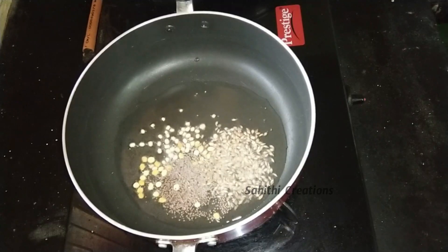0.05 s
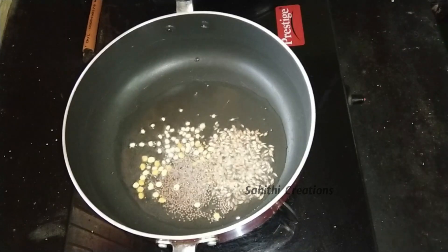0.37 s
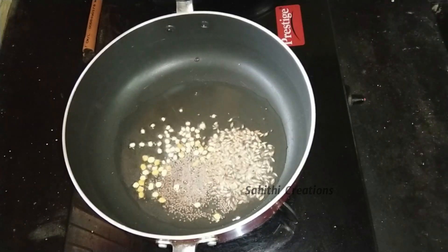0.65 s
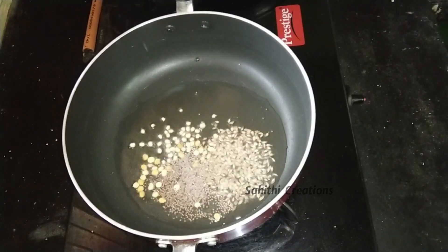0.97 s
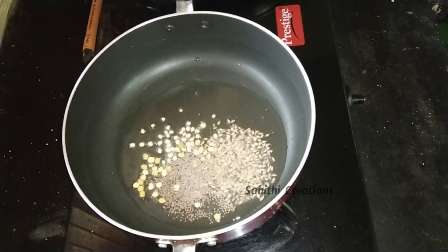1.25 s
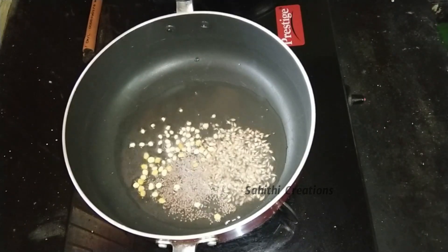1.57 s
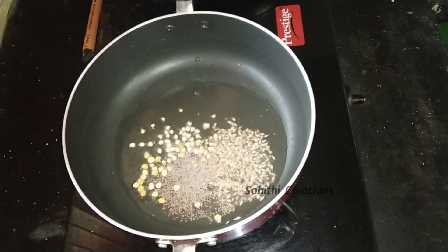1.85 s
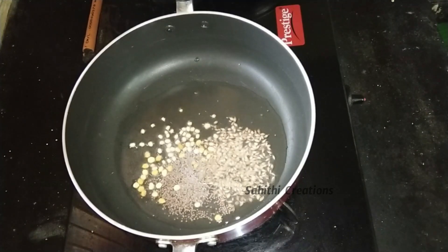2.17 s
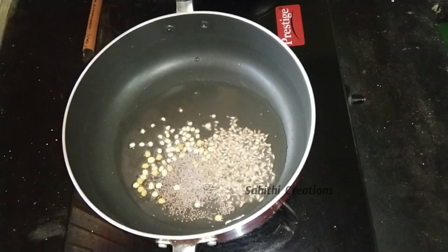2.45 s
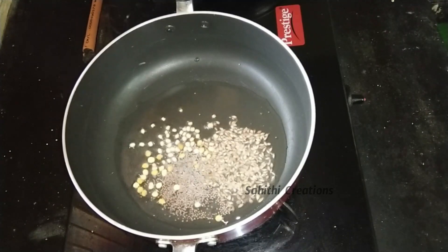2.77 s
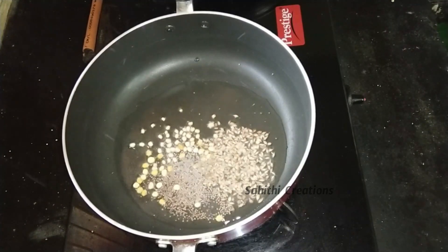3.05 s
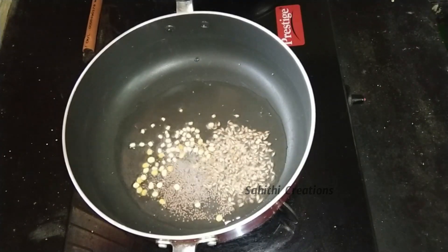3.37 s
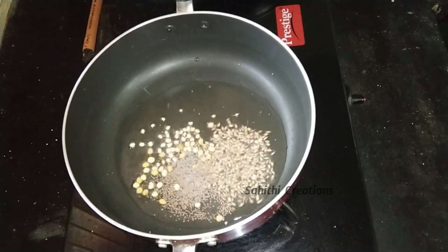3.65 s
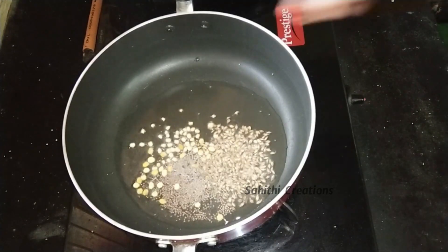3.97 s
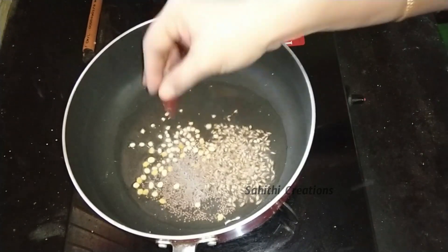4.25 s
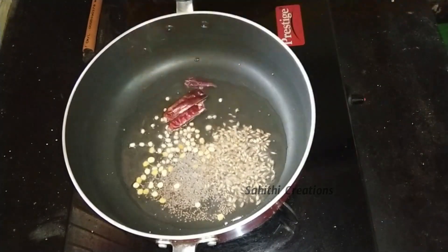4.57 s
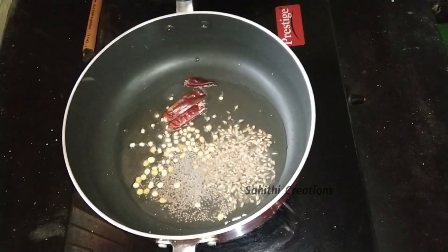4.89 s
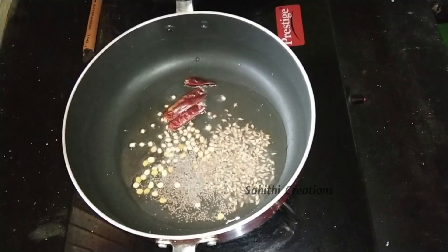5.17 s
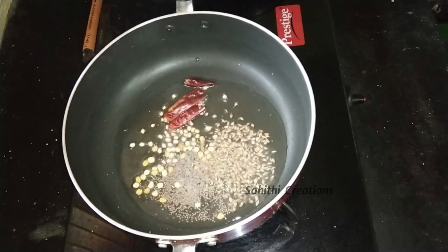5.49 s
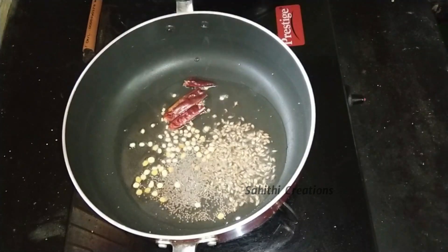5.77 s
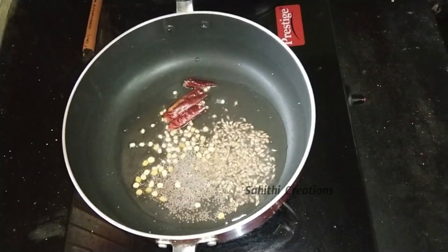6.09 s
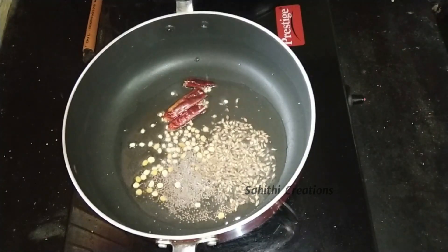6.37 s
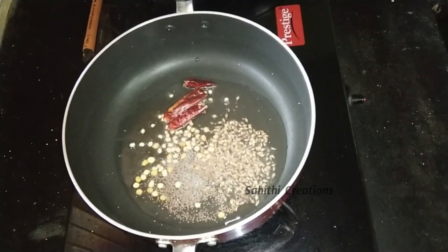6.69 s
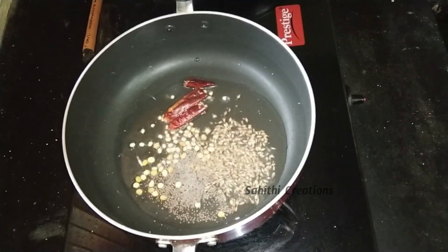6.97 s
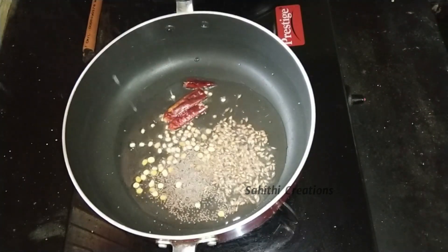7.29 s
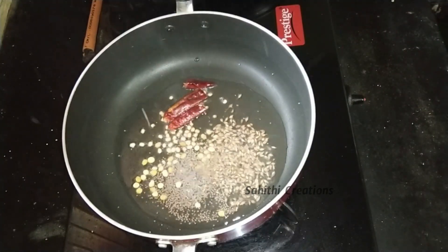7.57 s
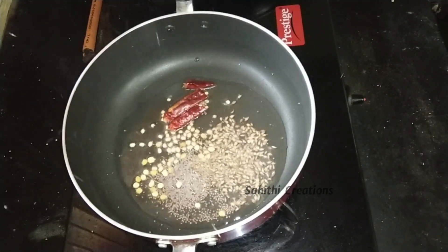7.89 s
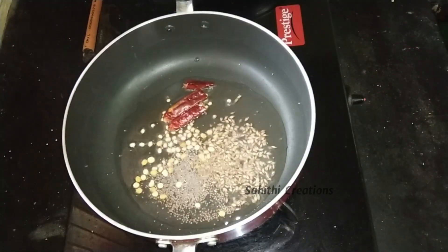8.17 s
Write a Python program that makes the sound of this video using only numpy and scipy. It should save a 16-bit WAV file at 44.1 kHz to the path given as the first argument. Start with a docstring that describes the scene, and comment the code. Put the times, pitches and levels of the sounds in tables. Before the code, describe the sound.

Sharp, bright snaps of seeds bursting in a deep oiled pan come ever faster over a faint gas flame.

```python
"""Seeds bursting in hot oil

Mustard and cumin seeds burst in a deep pan, more and more often, over a low gas flame in a small kitchen.
Each husk snaps and sets a short ping ringing; the pan scatters the sound and the room adds a tail.
Oil spits strike the microphone close above. The cook slides something aside and drops in dried chillies;
the simmer then grows."""
import sys
import numpy as np
from scipy import signal
from scipy.fft import rfft, irfft
from scipy.io import wavfile

SR = 44100
rng = np.random.default_rng(int(sys.argv[2]) if len(sys.argv) > 2 else 0)


def wav_out(sig):
    """Save sig, one row per channel (or a flat mono array), as 16-bit PCM at SR to the path in sys.argv[1]."""
    wavfile.write(sys.argv[1], SR, np.round(np.clip(np.atleast_2d(sig).T, -1, 1) * 32767).astype(np.int16))


N = 367353
TIME = np.arange(N) / SR

# louder seed bursts, relative levels: start_s, snap_db, ping_db, pitch_hz
BURSTS = [(0.1952, -22.5, -4.5, 3800), (0.2715, -14, -18, 4200), (0.4712, -14.5, -21, 3940),
          (0.521, -12, -24, 4200), (0.7118, -15, -17, 3830), (0.9052, -13.5, -10.5, 4050),
          (1.0187, -14, -22.5, 4390), (1.085, -16, -25, 4150), (1.1958, -15, -15, 3740),
          (1.2515, -15.5, -8.5, 3630), (1.3029, -11.5, -22, 4370), (1.4138, -15.5, -8.5, 3460),
          (1.447, -10, -19, 3730), (1.565, -11.5, -10.5, 3660), (1.5785, -17.5, -18, 3260),
          (1.6366, -15.5, -9, 3480), (1.7444, -20, -13.5, 3440), (1.7712, -15.5, -22, 4420),
          (1.815, -19.5, -8, 3490), (1.851, -7, -21, 4650), (2.0359, -23, -4, 3610),
          (2.1147, -14.5, -10, 2700), (2.364, -20.5, -20.5, 4480), (2.4326, -17, -7, 3820),
          (2.657, -18, -16, 3380), (2.673, -15, -25, 3650), (2.792, -12, -4, 4260),
          (2.9103, -6.5, -18, 4690), (2.9389, -9.5, 0, 3700), (3.011, -14, -24, 4080),
          (3.201, -12, -10, 4230), (3.3428, -11, -5.5, 3640), (3.4, -13.5, -11, 3450),
          (3.4086, -12.5, -23, 3940), (3.4469, -12.5, 1, 3130), (3.486, -20.5, -4.5, 3420),
          (3.5761, -12, -15, 3960), (3.6272, -16, -22, 4410), (3.7196, -11.5, -9.5, 3640),
          (3.7502, -17.5, -3.5, 3880), (3.7967, -17, -0.5, 4300), (3.8565, -22, -9, 3590),
          (3.8874, -14, -23, 4000), (3.9112, -10.5, -7.5, 4050), (3.9652, -13, -21, 4510),
          (4.1267, -16, -2.5, 3960), (4.153, -12.5, -6, 4070), (4.2073, -13, -25, 4300),
          (4.2815, -15, -20.5, 3810), (4.3588, -22, -17.5, 3200), (4.3651, -11.5, -12.5, 3650),
          (4.4562, -16.5, -19, 4300), (4.5152, -14.5, -22, 4190), (4.5447, -31, -14, 3720),
          (4.6669, -14.5, -23, 3940), (4.7065, -23.5, -3.5, 3730), (4.7381, -13, -12, 3770),
          (4.808, -13.5, -22, 4110), (4.8576, -9.5, -15, 3480), (4.9107, -12, -14, 3880),
          (4.9908, -21, -8.5, 4140), (5.0225, -21, -15.5, 3520), (5.0891, -8, -3.5, 3700),
          (5.1088, -21, -6.5, 3680), (5.1619, -23, -5, 3450), (5.235, -18, -6, 3570),
          (5.2571, -16.5, -25, 4430), (5.361, -17.5, -18, 3650), (5.3748, -18, -17.5, 3600),
          (5.4489, -16.5, -6, 3610), (5.4768, -6.5, -18, 3730), (5.5026, -19.5, -9, 3830),
          (5.5837, -14.5, -21, 4240), (5.6201, -10, -3.5, 3820), (5.7393, -10, -10, 3750),
          (5.8011, -11.5, -7.5, 4300), (5.8617, -21.5, -1.5, 3980), (5.9205, -7.5, -20, 4070),
          (5.9797, -25, -6, 3730), (6.0147, -11, -21, 4470), (6.024, -16, -4.5, 3600),
          (6.0797, -5.5, -5.5, 4100), (6.272, -20.5, -17, 3800), (6.306, -13, -10, 3640),
          (6.316, -10.5, -6.5, 3900), (6.3358, -15, -4.5, 3480), (6.3597, -10.5, -7, 3800),
          (6.4221, -19, -5.5, 3550), (6.483, -18.5, -11.5, 4020), (6.5075, -15, -31, 4070),
          (6.525, -12.5, -9.5, 3510), (6.5386, -16.5, -5.5, 4040), (6.6431, -11, -21, 3720),
          (6.6624, -15, -10, 3760), (6.702, -21, -1, 2920), (6.7157, -11.5, -12, 3060),
          (6.787, -20, -8, 4030), (6.8969, -8.5, -5.5, 3520), (6.9578, -13, -19, 4230),
          (7.0123, -16.5, -20, 4100), (7.0673, -12.5, -19, 3960), (7.1584, -15.5, -18, 3940),
          (7.193, -18.5, -14.5, 4270), (7.222, -13.5, -16, 3860), (7.2689, -26, -7, 3510),
          (7.2912, -12, -16, 4050), (7.38, -6.5, -5.5, 3560), (7.3973, -20, -6.5, 3520),
          (7.4379, -19, -7.5, 3980), (7.4952, -12, -17, 3860), (7.5186, -11.5, -18, 4230),
          (7.5771, -14.5, -14, 3640), (7.6402, -10.5, -8, 3830), (7.657, -16, -3, 3530),
          (7.6713, -30, -3.5, 3590), (7.7069, -20, -3, 3640), (7.7512, -16.5, -1.5, 3380),
          (7.759, -18.5, -1.5, 3360), (7.8069, -9, -4, 3800), (7.8932, -21, -10, 3540),
          (7.9664, -25, -15, 4380), (8.0618, -23, -9.5, 3280), (8.0951, -10.5, -12.5, 3790),
          (8.166, -23, -4, 3550), (8.253, -6, 2.5, 3760)]
# spectrum of a splitting husk: freq_hz, gain_db
HUSK_SPECTRUM = [(150, -27.5), (600, -12), (1100, -14.5), (1600, -7.5), (2100, -9), (2600, -5), (3500, -3),
                 (4600, 0), (5800, 1.5), (7000, 5.5), (7700, 3.5), (8500, -5)]
# response of the pan's hollow: freq_hz, gain_db
PAN_HOLLOW = [(2300, -2), (2700, 2.5), (3050, -6), (3380, 3.5), (3700, 1), (4100, 0.5), (4800, 4),
              (5800, -0.5)]


def seed_bursts(snap_gain_db=8.5, ping_t60_s=0.0036, room_ping_t60_s=0.002, room_ping_db=-1.5):
    """Each husk splits with a bright snap and a short ping, its pitch set by the seed."""
    snaps, pings = np.zeros(N), np.zeros(N)
    click = TIME[:SR // 100] == 0
    for start_s, snap_db, ping_db, pitch_hz in [*BURSTS, *neighbour_bursts()]:
        # seeds under the heap send less direct sound and more echoes
        echo_db = -1.8 + rng.uniform(-2, 2)
        snap = in_room(pan_scatter(echo_db, t60_s=0.039))
        add(snaps, start_s, from_db(snap_db + snap_gain_db) * snap)
        ping = unit_energy(ring(pan_scatter(echo_db + 4.5, t60_s=0.018), pitch_hz, ping_t60_s))
        add(pings, start_s, from_db(ping_db) * ping)
        # the room gets a blunter, less pitched ping
        blunt_ping = unit_energy(ring(click, pitch_hz, room_ping_t60_s))
        room_ping = signal.fftconvolve(blunt_ping, kitchen_response())
        add(pings, start_s, from_db(ping_db + room_ping_db) * room_ping)
    pings = butter(colour(pings, PAN_HOLLOW), 2330, "high", order=4)
    return colour(snaps, HUSK_SPECTRUM) + butter(pings, 5600, "low")


def neighbour_bursts(tries=3, first_chance=0.025, doubling_s=1.5, wait_s=(0.009, 0.075), gap_s=0.026):
    """A burst may set off weaker ones, more likely as the oil heats; rows as in BURSTS."""
    loud_s = np.array(BURSTS)[:, 0]
    next_loud_s = np.repeat(np.append(loud_s[1:], TIME[-1]), tries)
    luck, delay = rng.random((len(next_loud_s), 2)).T
    start_s = np.repeat(loud_s, tries) + np.interp(delay, [0, 1], wait_s)
    snap_db, ping_db, pitch_hz = rng.normal([-16.5, -23.5, 3700], [3, 3, 320], (len(start_s), 3)).T
    set_off = luck < first_chance * 2 ** (start_s / doubling_s)
    in_pause = start_s < next_loud_s - gap_s
    return np.transpose([start_s, snap_db, ping_db, pitch_hz])[set_off & in_pause]


def pan_scatter(echo_db, t60_s, echoes_per_s=3500):
    """Direct sound, then quick echoes off the pan wall; energy 1."""
    t = TIME[:SR // 40]
    echoes = rng.standard_normal(len(t)) * (rng.random(len(t)) < echoes_per_s / SR)
    echoes *= dying(t, t60_s) * (t > 0.0004)
    return unit_energy((t == 0) + from_db(echo_db) * unit_energy(echoes))


# pan modes: freq_hz, gain_db, t60_s
PAN_MODES = [(1875, -39.5, 0.047), (2091, -48.5, 0.18), (2650, -50, .04), (2758, -46.5, 0.088),
             (2970, -53, 0.04), (3130, -54, 0.2), (3383, -53, 0.09), (3536, -49.5, 0.047),
             (3640, -49.5, 0.04), (4260, -69, 0.14), (4380, -73.5, .1), (5700, -64, 0.091),
             (6100, -58, 0.16), (6220, -57.5, 0.1), (6450, -70, 0.045)]


def in_pan(sound):
    """A sound plus the faint ringing it leaves in the pan."""
    return sound + sum(from_db(db) * ring(sound, hz, t60_s) for hz, db, t60_s in PAN_MODES)


# spectrum of tiny steam bubbles: freq_hz, gain_db
FIZZ_SPECTRUM = [(1000, -11), (2200, -20), (2800, -18), (3500, 4.5), (4300, 2.5), (5200, -5), (7200, -1.5),
                 (8500, -8)]


def simmer(rise_from_s=5.9, bubbles_per_s=3000, fizz_db=-56, rise_db_per_s=1.9, tick_db=-21.5):
    """Tiny steam bubbles fizz and larger ones tick; both build up as the chillies fry."""
    frying_s = np.maximum(TIME - rise_from_s, 0)
    ticks_per_s = 3 + 16 * frying_s
    ticks = (rng.random(N) < ticks_per_s / SR) * from_db(tick_db) * rng.random(N)
    ticks = signal.fftconvolve(ticks, in_room(pan_scatter(echo_db=3.0, t60_s=0.021)))[:N]
    bubbles = (rng.random(N) < bubbles_per_s / SR) * rng.standard_normal(N)
    fizz = rms_one(colour(bubbles, FIZZ_SPECTRUM))
    return colour(ticks, HUSK_SPECTRUM) + from_db(fizz_db + rise_db_per_s * frying_s) * fizz


# oil drops on the microphone: start_s, signed_height, leak_s, lowpass_hz
OIL_DROPS = [(1.3793, -0.16, 0.000085, 5000), (1.7719, -0.059, 0.00018, 5000),
             (1.8926, -0.19, 0.00007, 5000), (2.8898, 0.43, .05, 1100), (4.9760, 0.055, 0.00012, 4000),
             (5.9329, -0.089, .00013, 5000), (6.3512, -0.12, 0.00011, 5000), (6.5850, -.33, .0018, 5000),
             (7.0127, .09, .05, 2500), (7.7259, -0.41, .05, 4000), (8.2372, 0.18, .05, 600)]


def oil_spits(bass_cut_hz=61):
    """A drop on the port is a leaking pressure step; the microphone's bass cut makes it swing."""
    pressure, t = np.zeros(N), TIME[:SR // 2]
    for start_s, height, leak_s, lowpass_hz in OIL_DROPS:
        step = height * np.exp(-t / leak_s)
        add(pressure, start_s, butter(step, lowpass_hz, "low", order=1))
    return butter(pressure, bass_cut_hz, "high", order=5)


# slides over the counter: start_s, length_s, level_db, resonance_hz
COUNTER_SLIDES = [(0.331, 0.11, -52, 873), (0.368, 0.2, -59.5, 900), (1.727, 0.24, -61, 1084),
                  (2.21, 0.16, -58.5, 780), (5.471, 0.24, -58, 585), (5.509, 0.29, -62.5, 317)]


def slides(grit_db=1.5, width_hz=100):
    """Soft friction: a band of grit plus noise through one resonance."""
    out = np.zeros(N)
    for start_s, length_s, level_db, resonance_hz in COUNTER_SLIDES:
        size = int(length_s * SR)
        grit = rms_one(butter(rng.standard_normal(size), [700, 2600], "band"))
        friction = narrow_noise(resonance_hz, width_hz, size) + from_db(grit_db) * grit
        add(out, start_s, from_db(level_db) * np.sqrt(np.hanning(size)) * friction)
    return butter(out, 200, "high")


# light blows as the chillies go in: start_s, level_db
BLOWS = [(4.3585, -45.5), (4.3795, -35), (4.470, -52)]
# modes of the knocked body: freq_hz, gain_db, t60_s
BODY_MODES = [(645, 4.5, 0.05), (900, 1, .015), (1210, -7, 0.13), (1335, 4.5, 0.016), (1825, -4.5, 0.05)]


def knocks():
    """Each blow rings a few dull modes."""
    blows = np.zeros(N)
    for start_s, level_db in BLOWS:
        add(blows, start_s, from_db([level_db]))
    ringing = sum(from_db(db) * ring(blows, hz, t60_s) for hz, db, t60_s in BODY_MODES)
    return butter(ringing, 680, "high", order=3)


# spectrum of the flame and kitchen air: freq_hz, gain_db
FLAME_SPECTRUM = [(25, -34), (50, -24), (75, -9), (100, 6), (150, -2), (240, -5), (350, -0.5), (480, -8),
                  (620, -8.5), (1000, -10.5), (1700, -15), (3000, -11), (8000, -23)]


def gas_flame(level_db=-54):
    """The flame's soft, steady rush."""
    return from_db(level_db) * rms_one(colour(rng.standard_normal(N), FLAME_SPECTRUM))


# hum tones: pitch_hz, level_db, waver_width_hz, steady_gain
HUM_TONES = [(96, -64.5, 12, .3), (240.2, -66.5, 9.2, 0.9), (493.6, -64, 39, 0.69)]


def hum(waver_gain=0.43):
    """Low tones that waver a little: each is a sine plus narrow noise."""
    out = np.zeros(N)
    for pitch_hz, level_db, width_hz, steady_gain in HUM_TONES:
        steady = steady_gain * np.sin(2 * np.pi * pitch_hz * TIME)
        waver = waver_gain * narrow_noise(pitch_hz, width_hz, N)
        out += from_db(level_db) * rms_one(steady + waver)
    return butter(out, 60, "high")


def kitchen_response(tail_db=-5, t60_s=0.29, wall_s=0.011, wall_db=-16.5):
    """One distinct echo and a diffuse tail, different for every spot."""
    t = TIME[:SR // 3]
    tail = rng.standard_normal(len(t)) * dying(t, t60_s) * (t > 0.004)
    response = from_db(tail_db) * unit_energy(tail)
    add(response, rng.normal(wall_s, 0.00033), from_db([wall_db]))
    return response


def in_room(sound):
    """A sound plus its reverberation."""
    out = signal.fftconvolve(sound, kitchen_response())
    add(out, 0, sound)
    return out


def from_db(db):
    """Decibels to gain."""
    return 10 ** (np.asarray(db) / 20)


def rms_one(x):
    """Scale to rms 1."""
    return x / np.sqrt(np.mean(x ** 2) + 1e-20)


def unit_energy(x):
    """Scale to energy 1."""
    return x / np.sqrt(np.sum(x ** 2) + 1e-20)


def butter(x, hz, kind, order=2):
    """Causal Butterworth filter."""
    return signal.sosfilt(signal.butter(order, hz, kind, fs=SR, output="sos"), x + 1e-18)


def colour(x, spectrum, size=4096):
    """Minimum-phase filter through (freq_hz, gain_db) points."""
    hz, db = np.transpose(spectrum)
    grid_hz = np.maximum(np.arange(size // 2 + 1) * SR / size, 1)
    gain = from_db(np.interp(np.log(grid_hz), np.log(hz), db))
    cepstrum = irfft(np.log(gain))
    cepstrum[1:size // 2] *= 2
    cepstrum[size // 2 + 1:] = 0
    response = irfft(np.exp(rfft(cepstrum)))
    return signal.fftconvolve(x, response)[:len(x)]


def dying(t, t60_s):
    """Envelope that loses 60 dB in t60_s."""
    return np.exp(-np.log(1000) * t / t60_s)


def ring(x, hz, t60_s):
    """Resonator: a unit click starts a decaying sine of height 1."""
    radius, angle = dying(1 / SR, t60_s), 2 * np.pi * hz / SR
    return signal.lfilter([0, np.sin(angle)], [1, -2 * radius * np.cos(angle), radius ** 2], x + 1e-18)


def narrow_noise(hz, width_hz, size):
    """Noise through one resonance, rms 1."""
    t60_s = np.log(1000) / (np.pi * width_hz)
    return rms_one(ring(rng.standard_normal(size), hz, t60_s))


def add(track, start_s, sound):
    """Mix a sound into a track at start_s."""
    at = int(np.clip(round(start_s * SR), 0, N - 1))
    track[at:at + len(sound)] += sound[:N - at]


def scene():
    """One microphone above the pan feeds both channels."""
    frying = in_pan(seed_bursts() + simmer())
    handling = in_room(slides() + knocks())[:N]
    mono = frying + oil_spits() + handling + hum() + gas_flame()
    return np.array([mono, mono])


def record(dry, cutoff_hz=8100):
    """Steep linear-phase low-pass; the snaps stay sharp."""
    low_pass = signal.firwin(101, cutoff_hz, window=("kaiser", 3.0), fs=SR)
    return signal.fftconvolve(dry, low_pass[None], mode="same", axes=1)


dry = scene()
out = record(dry)
wav_out(out)
```